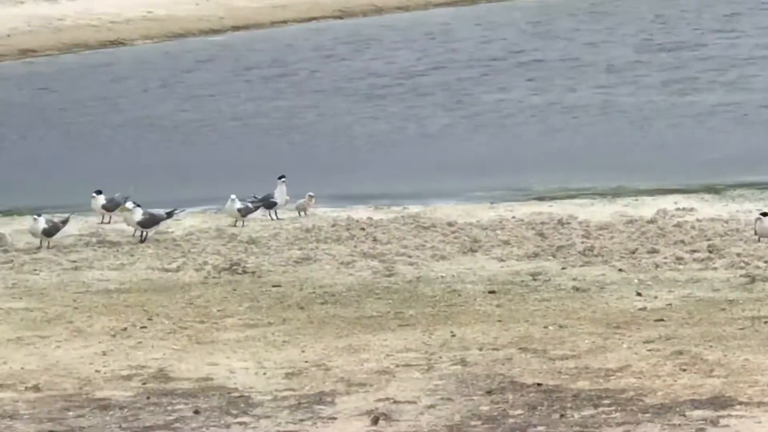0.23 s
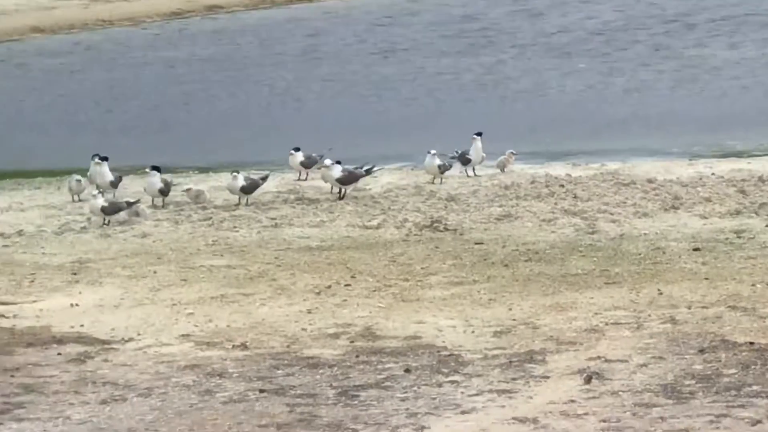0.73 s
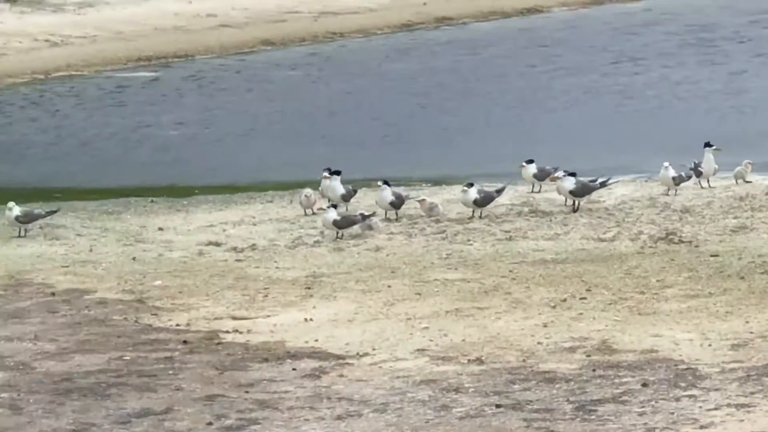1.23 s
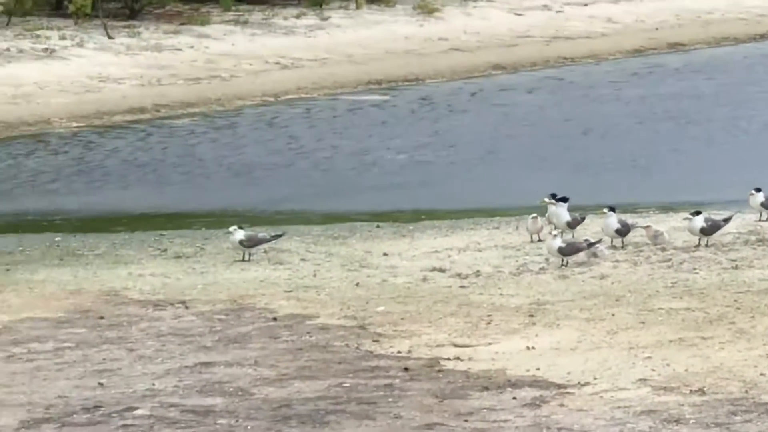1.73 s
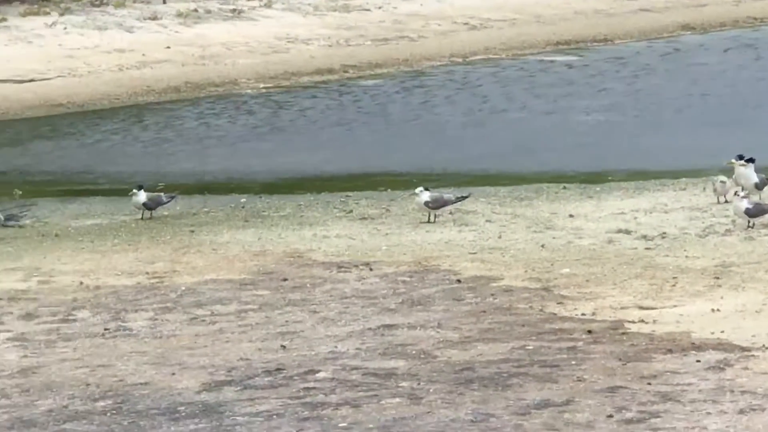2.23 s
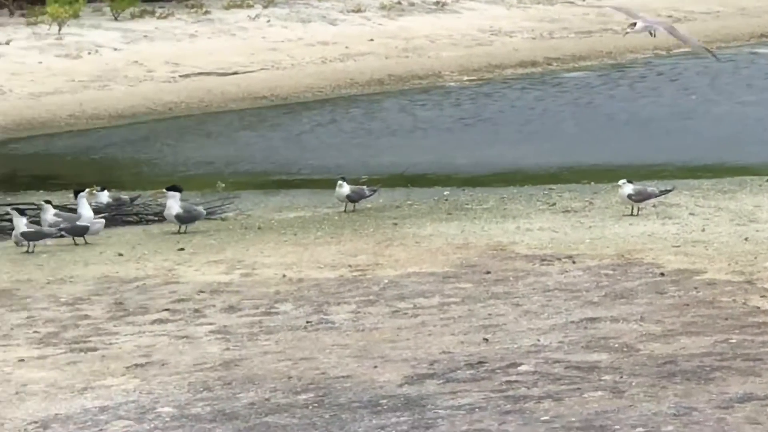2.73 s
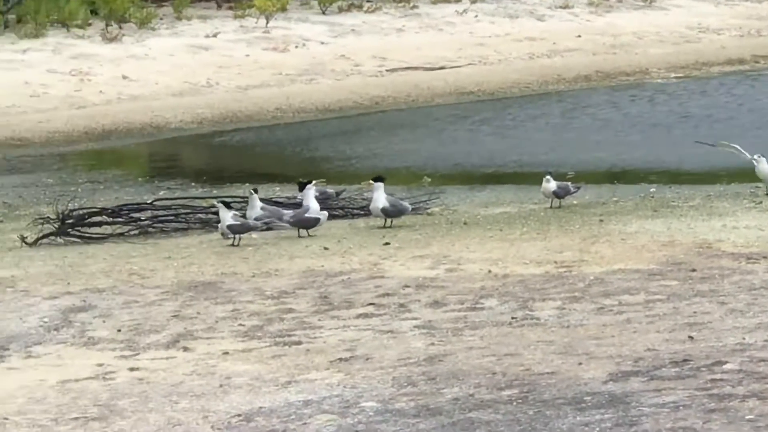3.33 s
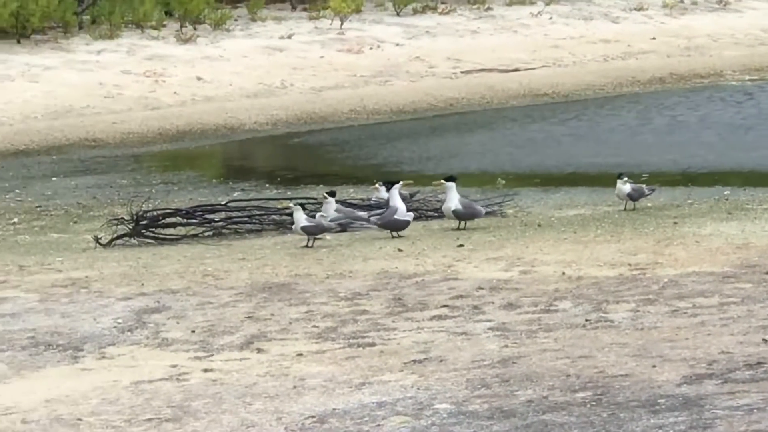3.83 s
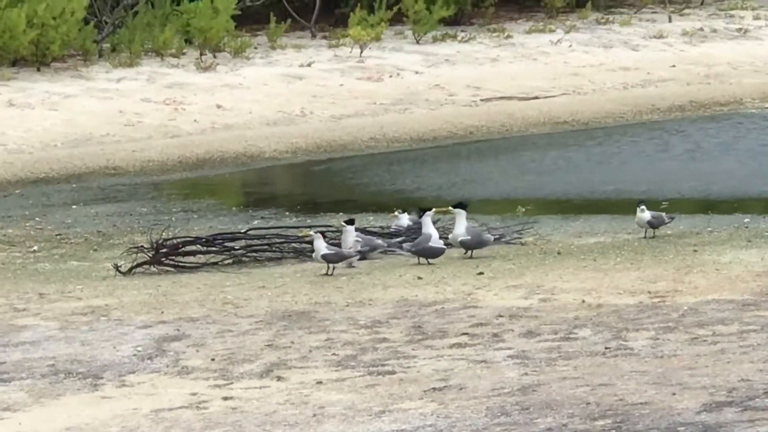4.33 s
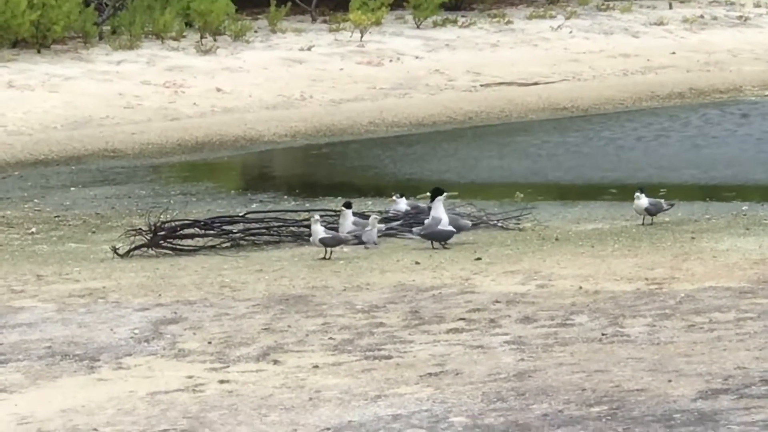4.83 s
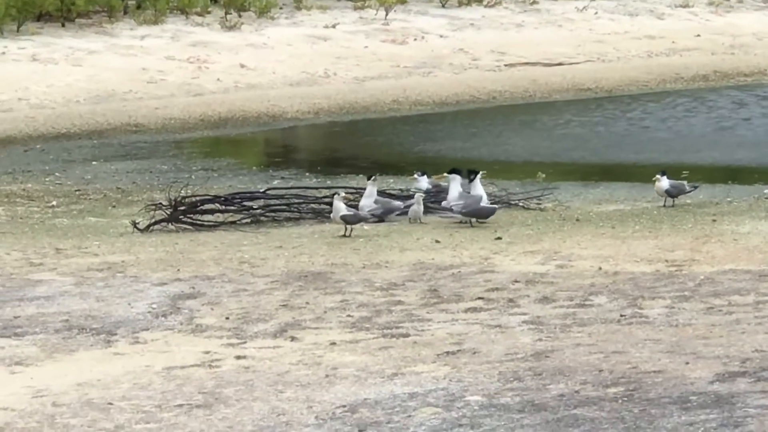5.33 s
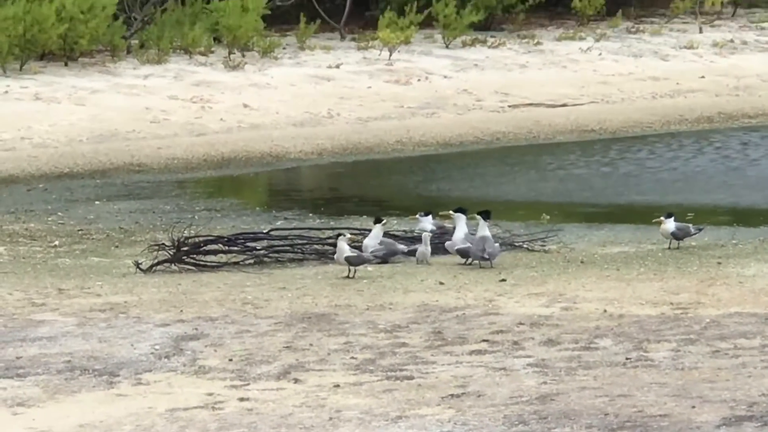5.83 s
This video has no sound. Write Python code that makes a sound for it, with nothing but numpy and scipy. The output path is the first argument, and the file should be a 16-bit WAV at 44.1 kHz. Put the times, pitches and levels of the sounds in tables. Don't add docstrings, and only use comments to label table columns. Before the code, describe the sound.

Wind rumbles straight onto a bare microphone, with heavy thumps and sharp buffeting bursts. Through it, several terns bicker nearby: dry, ratcheting cries, short pips, hoarse clicks and brief thin whistles, while more birds chatter farther off. One tears out a drawn-out rasp midway, followed by louder squabbling. Distant surf hisses faintly, dipping under the gusts; the open beach adds hardly any echo.

```python
import sys
import numpy as np
from scipy import signal
from scipy.fft import rfft, irfft, next_fast_len
from scipy.io import wavfile
from scipy.ndimage import uniform_filter1d

SR = 44100
rng = np.random.default_rng(int(sys.argv[2]) if len(sys.argv) > 2 else 0)


def gain_from_decibels(decibels):
    exponent = np.asarray(decibels, float) / 20
    return 10 ** exponent


def digitize_waveform(pressure):
    field = np.atleast_2d(pressure).T
    bounded = np.clip(field, -1, 1)
    quanta = np.round(bounded * 32767).astype(np.int16)
    wavfile.write(sys.argv[1], SR, quanta)


N = 267819


def colour_db(shape, hz):
    f, db = np.transpose(shape)
    return np.interp(np.log(np.maximum(hz, 1)), np.log(f), db)


def shaped(x, shape):
    size = next_fast_len(len(x))
    gain = gain_from_decibels(colour_db(shape, np.fft.rfftfreq(size, 1 / SR)))
    y = irfft(rfft(x, size) * gain, size)[:len(x)]
    return y / np.sqrt(np.mean(y ** 2))


def noise(shape):
    return shaped(rng.standard_normal(N), shape)


def walk(rate):
    hold = int(SR / rate)
    steps = np.repeat(rng.standard_normal(N // hold + 1), hold)
    return 1.3 * uniform_filter1d(uniform_filter1d(steps, hold), hold)[:N]


def swells(t, rows, swing_db, rest_db):
    power, coarse = gain_from_decibels(2 * rest_db), t[::64]
    for s, build, decay, db in rows:
        away = np.maximum((s - coarse) / build, (coarse - s) / decay)
        power = power + gain_from_decibels(2 * (db - swing_db * away))
    return np.interp(t, coarse, 10 * np.log10(power))


def syrinx(hz, shape, bright_db, count=16, gape_hz=3000., gape_db=0.):
    gape_width_hz = 1400
    k = np.arange(1, count + 1)[:, None]
    lift = np.clip((k - 1.8) / 1.8, 0, 1) * np.clip(2.1 - k / 3.6, .7, 1)
    gape = gape_db * np.exp(-((k * np.mean(hz) - gape_hz) / gape_width_hz) ** 2)
    level_db = colour_db(shape, k * np.mean(hz)) + bright_db * lift + gape
    gain = gain_from_decibels(level_db) * (k * np.max(hz) < .45 * SR)
    phase = np.cumsum(2 * np.pi * hz / SR)
    tone = np.sum(gain * np.sin(k * phase + 0.61 * k ** 2), axis=0)
    return tone / np.sqrt(np.sum(gain ** 2) / 2)


# (peak t/s, build/s, decay/s, rumble level/dB, buffeting level/dB)
GUSTS = [(0, .1, 0.96, -30, -36.5), (.34, 0.27, 0.09, -17, -45), (.65, 0.33, 0.039, -20, -29.5),
         (.86, 0.062, 0.22, -20, -39), (0.99, 0.066, 0.12, -18.5, -11), (1.13, 0.166, 0.075, -17, -17),
         (1.479, 0.1, 0.088, -19, -27.5), (1.71, 0.12, 0.087, -23, -32), (2.102, 0.49, 0.065, -15.5, -22.5),
         (2.24, 0.37, 0.38, -23.5, -39), (2.48, 0.034, 0.15, -17.5, -31.5), (3.29, 0.049, 0.77, -27.5, -45),
         (3.59, 0.57, 0.13, -21.5, -34.5), (3.829, 0.12, 0.085, -15, -12), (4.0, 0.18, 0.11, -30, -19.5),
         (4.431, 1, 0.047, -24, -30), (4.562, 0.028, 0.053, -14.5, -15), (4.85, 0.054, 0.37, -19.5, -13.5),
         (4.97, 0.16, 0.083, -8, -9.5), (5.08, 0.075, 0.4, -18.5, -32), (5.29, 0.66, 0.49, -26, -20.5),
         (5.59, 0.77, 0.3, -22, -16.5), (5.96, 0.19, 0.12, -16.5, -14), (6.019, 0.081, 0.062, -7, -41)]


def gust_levels(t):
    rumble_rows = [gust[:4] for gust in GUSTS]
    buffet_rows = [gust[:3] + gust[4:] for gust in GUSTS]
    return swells(t, rumble_rows, 12.5, -38), swells(t, buffet_rows, 23.5, -48.5)


# (f/Hz, level/dB)
RUMBLE = [(15, -47), (30, -6.5), (58, 6), (130, 2), (250, -6.5), (500, -25.5), (2000, -90)]
# (f/Hz, level/dB)
BUFFET = [(60, -9), (200, 3.5), (360, -1), (580, -1.5), (1100, -15), (1900, -26.5), (3300, -66),
          (6000, -64)]


def gusts(rumble_db, buffet_db, crack):
    lumps = gain_from_decibels(2.8 * walk(60) + 3.6 * walk(150))
    rumble = gain_from_decibels(rumble_db + 2 * walk(25.23)) * noise(RUMBLE)
    buffeting = gain_from_decibels(buffet_db + 0.5) * lumps * noise(BUFFET)
    small_eddies = gain_from_decibels(1.77 * buffet_db - 3.0) * lumps * gain_from_decibels(7 * walk(400)) * crack
    return rumble + buffeting + small_eddies


# (f/Hz, level/dB)
SURF = [(200, -41), (600, -20), (1800, 2), (3300, -23), (7600, -27), (15800, -56)]


def surf(buffet_db):
    level_db = -46
    return gain_from_decibels(level_db - 0.61 * (buffet_db + 50.0)) * noise(SURF)


def throb(rate, sharp):
    phase = np.cumsum(rate) / SR % 1
    return np.minimum(phase / 0.078, 1) * np.exp(-phase * sharp)


# (f/Hz, level/dB)
THROAT = [(500, -43), (1100, -6.5), (2000, 1.5), (2900, 1.5), (3700, -0.5), (4900, -8.5), (6300, -12),
          (9000, -49)]
# (f/Hz, level/dB)
BREATH = [(1000, -5), (1800, 1.5), (4200, -2.5), (6500, -18), (8600, -14.5), (10300, -19), (12200, -20.5),
          (16000, -27.5)]
# (peak t/s, build/s, decay/s, level/dB)
OUTBURSTS = [(0, .1, 0.25, -36.5), (.19, 0.07, 0.78, -31.5), (.41, 0.31, 0.069, -29), (.63, 0.67, 1, -33),
             (1.0, 0.064, 0.056, -29), (1.149, 0.15, 0.1, -38), (1.42, 0.22, 0.26, -30.5),
             (1.57, 0.53, 0.25, -32.5), (1.94, 1, 0.53, -39), (2.36, 0.5, 0.12, -31.5),
             (2.71, 0.2, 0.78, -34), (2.9, 0.35, 0.12, -28), (3.31, 1, 0.16, -36),
             (3.469, 0.068, 0.052, -24.5), (3.67, 0.083, 0.31, -36), (3.81, 0.12, 0.23, -29),
             (4.12, 0.43, 0.12, -29.5), (4.31, 0.14, 0.22, -31.5), (4.71, 0.53, 0.45, -29),
             (4.98, 0.045, 0.14, -36), (5.5, 0.37, 0.26, -35), (5.71, 0.24, 0.67, -31.5),
             (5.96, 0.67, 0.13, -41)]


def chatter(t):
    level_db = swells(t, OUTBURSTS, 28.5, -54)
    far_breath = THROAT[:7] + [(8000, -18), (11000, -46)]
    voices = 0
    for rest_hz in (880, 998, 1140, 1275):
        hz = rest_hz * (1 + .09 * walk(14) + 0.028 * walk(300))
        gate = throb(62 * (1 + 0.32 * walk(6)), 2.56) * gain_from_decibels(4.4 * walk(9))
        voices = voices + gate * (syrinx(hz, THROAT, 0., count=6) + 0.59 * noise(far_breath))
    crowd = np.sqrt(uniform_filter1d(voices ** 2, size=SR // 12))
    flicker = uniform_filter1d(np.abs(voices), size=100) / crowd
    hiss = flicker ** 1.4 * noise([(5500, -19)] + BREATH[3:])
    hiss_gain = gain_from_decibels(-14.5 + 0.13 * (level_db + 22.0))
    return gain_from_decibels(level_db - 1.0) * (voices / crowd + hiss_gain * hiss)


# (t/s, level/dB above the corner)
TILT = [(.2, -6), (.43, 2), (.9, -1), (1.4, 5), (1.65, 3), (2.3, 1), (2.85, 0.5), (3.45, -1), (3.7, 4),
        (3.95, 3), (4.3, -7), (4.55, -1), (4.78, -4), (5.1, -7), (5.7, 0)]


def tilted(birds, t):
    corner_hz = 11200
    top = signal.sosfiltfilt(signal.butter(6, corner_hz, "high", fs=SR, output="sos"), birds)
    return birds + (gain_from_decibels(np.interp(t, *np.transpose(TILT))) - 1) * top


# (t/s, treble breath level/dB)
FACING = [(.2, -8), (.37, -6.5), (.43, 5.5), (.5, -10), (.9, -0.5), (1.4, -11.5), (1.55, -15), (1.65, 0),
          (1.8, -24), (2.2, -1.5), (2.4, -17), (3.44, -7.5), (3.7, -14), (3.95, -7), (4.3, -13), (4.53, -6),
          (4.65, -19), (4.79, -6.5), (5.05, -20), (5.7, -5)]
# (f/Hz, level/dB)
GAPE_TREBLE = [(5000, -60), (7000, -29), (9000, -18), (10600, -29), (12300, -21), (14000, -32),
               (15800, -31)]


def near_birds():
    calls = trills() + cries() + pips() + held_notes() + clicks() + whistles()
    out, waver = np.zeros(N), walk(350)
    facing = gain_from_decibels(np.interp(np.arange(N) / SR, *np.transpose(FACING)))
    air = noise(BREATH[:4] + [(8000, -59)]) + facing * noise([(5500, -14.0)] + BREATH[3:])
    for s, ms, first_hz, last_hz, db, bright_db, voice, gape_hz, gape_db in calls:
        at = np.arange(int(s * SR), min(int((s + ms / 1000 + 0.0014) * SR), N))
        along = np.linspace(0, 1, len(at))
        hz = (first_hz + (last_hz - first_hz) * along ** 1.93) * (1 + .014 * waver[at])
        edge_s = np.minimum(along, 1 - along) * len(at) / SR
        envelope = np.sin(np.pi / 2 * np.clip(edge_s / 0.0016, 0, 1)) ** 2
        tone = syrinx(hz, THROAT, bright_db + 2.5, count=8, gape_hz=gape_hz, gape_db=gape_db)
        tone = tone + gain_from_decibels(-17.0) * facing[at] * syrinx(hz, GAPE_TREBLE, 0, count=15)
        out[at] += gain_from_decibels(db) * envelope * (voice * tone + (1.38 - voice) * air[at])
    return out


def echoed(birds):
    age = np.arange(SR // 16) / SR
    echo = rng.standard_normal(len(age)) * np.exp(-age / .008)
    return birds + gain_from_decibels(-33.5) * signal.fftconvolve(birds, echo)[:N]


# (first pip t/s, last pip t/s, top f/Hz, level/dB, brightness level/dB)
TRILLS = [
    (.002, 0.044, 1344, -42, 11),
    (1.449, 1.465, 1120, -33, 2),
    (1.534, 1.551, 1058, -33, 2),
    (1.607, 1.625, 1136, -29, 8),
    (1.892, 1.923, 1105, -36, 2),
    (2.165, 2.188, 1094, -35.5, -6),
    (2.293, 2.391, 1104, -33, 1),
    (3.285, 3.323, 1413, -35.5, 3.5),
    (3.781, 3.826, 992, -22, 2),
    (3.17, 3.245, 960, -37, -4),
]


def trills():
    beat_s, top_at = .0155, 0.373
    calls = []
    for first, last, top_hz, db, bright_db in TRILLS:
        gaps = round((last - first) / beat_s)
        for k in range(gaps + 1):
            along = k / gaps
            pitch_chance, level_chance = rng.standard_normal(2)
            sag = (along - top_at) ** 2 * min(gaps / 5, 1)
            share = 0.5 if along > top_at else 1.15
            hz = top_hz * (1 - share * sag) * (1 + 0.014 * pitch_chance)
            ms = max(8 + 8.9 * (hz / 1000 - 1.1), 3)
            pip_db = db - 4 * sag + 4 * level_chance
            voice = 0.8 if k == 0 and gaps > 2 else 1
            calls.append((first + (last - first) * along, ms, hz, 1.006 * hz, pip_db, bright_db, voice, 0, 0))
    return calls


# (t/s, peak level/dB)
THUMPS = [(.015, -6), (0.864, -6.5), (1.478, -9), (1.607, -3), (1.711, -6.5), (2.084, -1), (2.474, -6.5),
          (3.838, -7), (3.994, 5), (4.205, -9.5), (4.411, -6), (4.807, -1.5), (5.129, -1.5), (5.243, 0),
          (5.412, -4), (5.447, -9), (5.628, -13), (6.009, -2)]
# (t/s, peak level/dB)
PUFFS = [(0.09, -16), (0.139, -20), (0.487, -18.5), (0.594, -15), (0.64, -14), (0.841, -17), (0.923, -20),
         (1.357, -16.5), (1.407, -19.5), (1.555, -21), (1.677, -17), (1.837, -13), (1.904, -15.5),
         (1.969, -16), (2.445, -20.5), (2.564, -22), (3.529, -20.5), (3.933, -12.5), (4.062, -16),
         (4.118, -17), (4.267, -13), (4.34, -22), (4.742, -18), (5.04, -12), (5.096, -12), (5.291, -13.5),
         (5.388, -9), (5.471, -22), (5.692, -15), (5.815, -14.5), (5.862, -11)]
# (t/s, peak level/dB, crack level/dB above the pop)
HARD_EDDIES = [(.308, -7.5, -20), (.352, -4.5, -17.5), (.656, -7.5, -16), (.953, 0, -13.5),
               (.987, -4, -7.5), (1.013, 3.5, -6), (1.08, 2, -1), (1.133, 2, -5), (2.002, -7, -0.5),
               (2.097, 2, -11.5), (3.276, -19, -24.5), (3.752, -7.5, -18), (3.79, -6.5, -12.5),
               (4.545, -14, -16.5), (4.602, -10.5, -10), (4.849, -1, -4.5), (4.956, -2, -23.5),
               (4.971, 2, -5), (4.984, 3, -2.5), (5.055, -5, 1), (5.164, -1.5, -5.5), (5.195, -3, -10.5),
               (5.362, -10, -13), (5.497, -3.5, -9.5), (5.57, -3, -13.5), (5.884, -10.5, -0.5),
               (5.333, -12, -10.5), (5.369, -12, -5), (5.26, -14, -3.5), (5.545, -6.5, -8),
               (5.595, -5.5, -4.5), (5.936, -4.5, 0), (5.96, -9, -1), (5.925, -8, -3), (5.971, -4, -6)]


def eddies(crack):
    soft_crack_db = -24.5
    pop = noise(BUFFET)
    rows = HARD_EDDIES + [(s, db, soft_crack_db) for s, db in THUMPS]
    rows += [(s, db + 1.5, soft_crack_db) for s, db in PUFFS]
    out = np.zeros(N)
    for s, db, crack_db in rows:
        hz = rng.uniform(0.751, 1.289) * max(847.0 + 17 * crack_db, 200)
        at = np.arange(int((s - .003) * SR), min(int((s + 0.035) * SR), N))
        age_ms = (at - at[0]) / SR * 1000
        swell = np.minimum(age_ms / 5, 1) ** 2 * np.exp(-(age_ms / 14) ** 2)
        core = 0.9 * np.exp(-((age_ms - 6) / 2.64) ** 2) * np.sin(2 * np.pi * hz * age_ms / 1000)
        burst = swell * pop[at] + core
        snap = swell ** 8 * crack[at]
        out[at] += gain_from_decibels(db) * (burst / np.abs(burst).max() + gain_from_decibels(crack_db) * snap / np.abs(snap).max())
    return out


# (t/s, duration/ms, f/Hz, level/dB, gape resonance f/Hz)
CRIES = [(.113, 8.6, 1350, -41.5, 5400), (0.131, 11, 1350, -39.5, 5400), (.148, 12, 1340, -38, 4100),
         (.160, 8.3, 1097, -30.5, 3300), (.174, 9.4, 1230, -26.5, 3620), (.190, 9.9, 1230, -28, 3700),
         (0.207, 12, 1205, -28, 4800), (0.221, 6.9, 1130, -30, 3400), (.237, 8, 1130, -30, 3400),
         (.252, 15, 1287, -31, 3900), (0.271, 9.5, 1086, -27, 3200), (.292, 6, 1070, -28.5, 2500),
         (.303, 7, 910, -25, 2000), (1.642, 9.7, 1240, -25, 3770), (1.658, 9.6, 1154, -25.5, 3450),
         (1.675, 6.8, 1090, -31, 3200), (1.689, 6, 1010, -32, 3000), (3.416, 6, 940, -31.5, 2800),
         (3.427, 18, 925, -29.5, 2800), (3.45, 5.2, 880, -28, 2600), (3.465, 11, 960, -31, 2800),
         (3.478, 9, 930, -25.5, 2800), (3.492, 7.3, 910, -27.5, 2700), (3.507, 6.9, 892, -26, 2700),
         (3.521, 7, 886, -28.5, 2700), (3.545, 6.8, 904, -29, 1800), (3.624, 6.3, 1070, -30, 4300),
         (3.642, 8, 1096, -27.5, 4500), (3.657, 9.8, 1125, -34, 4500), (3.659, 22.4, 786, -30, 1600),
         (3.716, 7.3, 950, -36.5, 2900), (3.728, 8.4, 970, -33.5, 3900), (3.74, 9, 955, -34, 2920),
         (5.491, 7.1, 1190, -28.5, 4750), (5.502, 6.2, 1147, -31, 4650), (5.516, 5.4, 1140, -28.5, 4550),
         (5.546, 6.3, 1100, -32, 4400), (5.582, 7, 1060, -30, 4250), (5.612, 5.1, 1054, -31.5, 4150),
         (1.374, 8, 1150, -27, 3500), (1.389, 13, 1260, -23, 3800), (1.405, 9, 1250, -25, 3750),
            (1.420, 10, 1170, -26, 3500), (1.435, 8, 1130, -28, 3400), (1.942, 9, 1130, -29, 3400),
            (1.958, 8, 990, -31, 3500), (4.544, 11, 1240, -24, 5000), (4.559, 9, 1200, -26, 4800),
            (4.574, 8, 1155, -28, 4600), (4.075, 9, 926, -22.5, 2750), (4.091, 9.8, 1058, -19, 3830),
            (4.122, 14, 1005, -19, 3000), (4.139, 11.4, 920, -24, 2750), (4.262, 12, 920, -25, 2800),
            (4.278, 14, 1038, -21.5, 3100), (4.294, 13, 1138, -21, 3400), (4.310, 16, 1023, -22.5, 3100),
            (4.325, 14, 996, -22.5, 3000), (4.342, 8.9, 910, -26.5, 2750), (4.357, 7, 1070, -32, 3200),
            (4.586, 7.2, 968, -34, 1900), (4.601, 10, 1103, -27, 4400), (4.617, 8.8, 944, -28, 1900),
            (4.623, 6, 1100, -39, 3300), (4.637, 6.1, 1074, -26, 3200), (4.652, 5, 1000, -34, 3000),
            (4.666, 8.5, 1027, -24.5, 3000), (4.686, 8.3, 995, -26, 3000), (4.696, 7.3, 1070, -24.5, 5300),
            (4.702, 34, 1160, -28, 2350), (4.736, 7.1, 1094, -22.5, 4400), (4.752, 7.5, 1110, -22, 4400),
            (4.768, 8, 1140, -23, 4500), (4.783, 8, 953, -25, 1900), (4.786, 5.5, 1240, -31, 5000),
            (4.797, 7.1, 1064, -29, 3200)]


def cries():
    return [(s, ms, .99 * hz, 1.015 * hz, db, -3.0, .96, gape_hz, 8)
            for s, ms, hz, db, gape_hz in CRIES]


# (t/s, duration/ms, f/Hz, level/dB, brightness level/dB)
PIPS = [(.32, 5.8, 1020, -25.5, 2), (0.34, 9.8, 1055, -26.5, 1), (.459, 6.9, 1110, -29.5, 0),
        (0.562, 20, 1197, -39, 2), (1.818, 7.5, 1256, -37, 12), (2.703, 9.5, 1220, -28, 9),
        (2.869, 11, 1314, -25.5, -7), (2.993, 6.1, 1073, -32.5, 4), (3.214, 7, 993, -29, -15),
        (3.574, 8.6, 904, -29, -21), (3.601, 7.4, 917, -29, -16), (3.927, 9.4, 998, -18.5, 7),
        (3.96, 10.4, 856, -20.5, -4), (5.696, 23, 1044, -36, 9), (5.713, 4.9, 1080, -42.5, 23)]


def pips():
    return [(s, ms, hz, 1.03 * hz, db, bright_db, 1, 0, 0) for s, ms, hz, db, bright_db in PIPS]


# (t/s, duration/ms, first f/Hz, last f/Hz, level/dB)
NOTES = [
    (0.363, 30, 1128, 1170, -30.5),
    (0.402, 49, 1280, 1190, -31),
    (2.116, 140, 1100, 1120, -45),
    (2.866, 49.5, 1275, 1160, -34),
    (3.349, 29, 1056, 1050, -48),
    (3.868, 17, 950, 1020, -38),
    (3.99, 44, 930, 915, -37),
    (5.006, 19, 980, 880, -40),
]


def held_notes():
    bright_db_per_khz, neutral_hz = 32, 1130
    return [(s, ms, first_hz, last_hz, db, bright_db_per_khz * (first_hz - neutral_hz) / 1000, 1, 0, 0)
            for s, ms, first_hz, last_hz, db in NOTES]


# (t/s, peak level/dB)
CLICKS = [(0.4724, -31), (0.888, -27.5), (.904, -28), (1.173, -27), (1.1965, -28.5), (1.3063, -29),
          (2.5544, -29.5), (2.5833, -27), (3.694, -22), (3.976, -13), (4.51, -23), (4.522, -24),
          (4.88, -25), (4.893, -21.5), (5.056, -22.5), (5.64, -28.5), (5.664, -39)]


def clicks():
    return [(s - .001, 7, 950, 990, db - 8.5, 0, .5, 0, 0) for s, db in CLICKS]


# (t/s, duration/ms, first f/Hz, last f/Hz, level/dB)
WHISTLES = [(.522, 128, 3420, 3320, -41.5), (1.985, 22, 3950, 3800, -40), (3.02, 60, 2600, 2500, -43),
            (.738, 20, 2750, 2750, -41), (.764, 18, 2300, 2470, -48), (.815, 58, 5150, 4690, -41),
            (4.165, 50, 2560, 2370, -47), (4.815, 41, 5310, 4760, -36), (5.641, 50, 2420, 2320, -46),
            (5.84, 30, 5250, 5050, -45.5), (5.858, 50, 2650, 2950, -40.5), (6.0, 50, 2800, 2710, -45.5)]


def whistles():
    calls = []
    for s, ms, first_hz, last_hz, db in WHISTLES:
        k = round(first_hz / 1250)
        calls.append((s, ms, first_hz / k, last_hz / k, db, -2.5, 1.2, first_hz, 14))
    return calls


# (t/s, f/Hz, level/dB, whistling breath level/dB)
RASP = [
    (2.6, 758, -38.5, -34),
    (2.65, 839, -29, -29),
    (2.719, 898, -26, -28),
    (2.799, 900, -25, -26),
    (2.85, 890, -24.5, -23),
    (2.895, 790, -24.5, -18),
    (2.946, 725, -26, -22),
    (2.97, 735, -51, -29),
]
# (t/s, throbs so far)
RASP_THROBS = [
    (2.592, 0),
    (2.7945, 17),
    (2.8315, 20),
    (2.896, 25),
    (2.975, 31),
]
# (f/Hz, level/dB)
RASP_THROAT = [(600, -43), (950, 2), (1800, 2.5), (2600, -1.5), (4500, -8), (6200, -20), (9000, -41),
               (14000, -38)]
# (f/Hz, level/dB)
RASP_HISS = [(6500, -20), (8200, -9), (10500, -11), (12000, -11), (12800, -1), (15500, -5)]


def rasp(t):
    s, *columns = np.transpose(RASP)
    at = np.flatnonzero((t > s[0]) & (t < s[-1]))
    hz, db, hiss_db = (np.interp(t[at], s, c) for c in columns)
    phase = np.interp(t[at], *np.transpose(RASP_THROBS)) % 1
    flow = 0.08 + np.minimum(phase / 0.064, 1) * np.exp(-(phase / 0.46) ** 1.16)
    hz = hz * (1.03 - 0.19 * np.exp(-phase / 0.13) + .026 * walk(300)[at])
    tone = syrinx(hz, RASP_THROAT, 0., count=18)
    breath = .6 * noise(RASP_THROAT)[at]
    hiss = gain_from_decibels(hiss_db) * noise(RASP_HISS)[at]
    out = np.zeros(N)
    out[at] = gain_from_decibels(db + 4.0) * flow * (tone + breath + hiss)
    return out


def scene():
    t = np.arange(N) / SR
    rumble_db, buffet_db = gust_levels(t)
    crack = noise([(550, -60), (1050, 12.0), (2600, -4), (5000, -29.5), (12000, -72)])
    wind = gusts(rumble_db, buffet_db, crack) + eddies(crack)
    self_noise = gain_from_decibels(-63) * rng.standard_normal(N)
    birds = tilted(chatter(t) + echoed(near_birds() + rasp(t)), t)
    return (birds + surf(buffet_db) + self_noise + wind)[None]


def low_pass(x):
    return signal.sosfilt(signal.butter(12, 15970, fs=SR, output="sos"), x)


def record(dry):
    top_hz = 15980
    loud = np.tanh(.9 * dry) / .93
    cut = signal.sosfilt(signal.ellip(10, .2, 80, top_hz, fs=SR, output="sos"), loud)
    mix = np.clip(cut, -1, 1)
    return low_pass(mix)


dry = scene()
out = record(dry)
digitize_waveform(out)
```